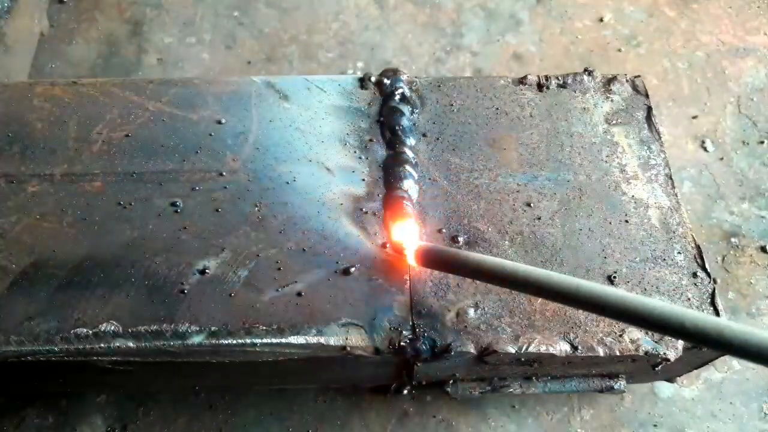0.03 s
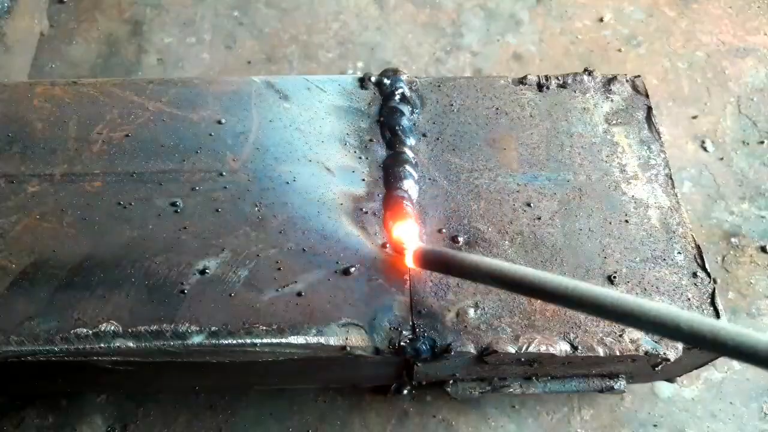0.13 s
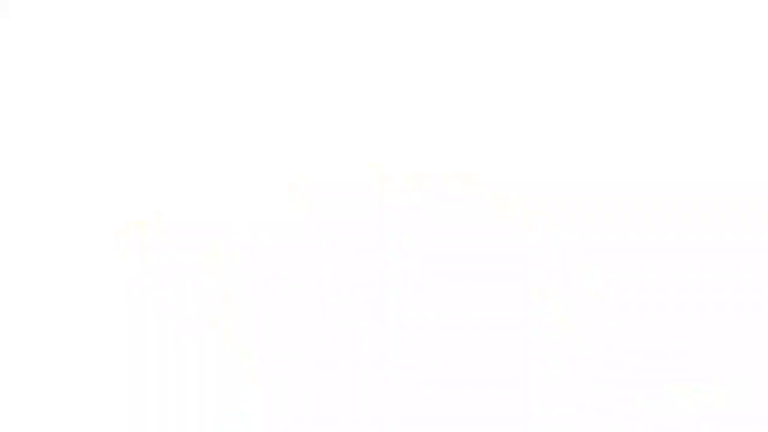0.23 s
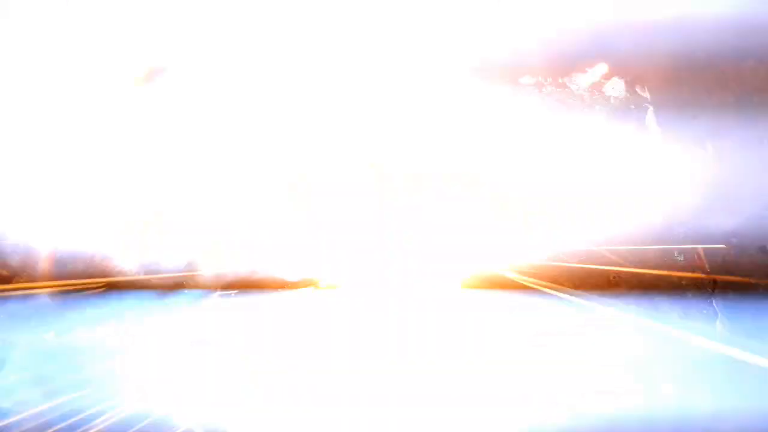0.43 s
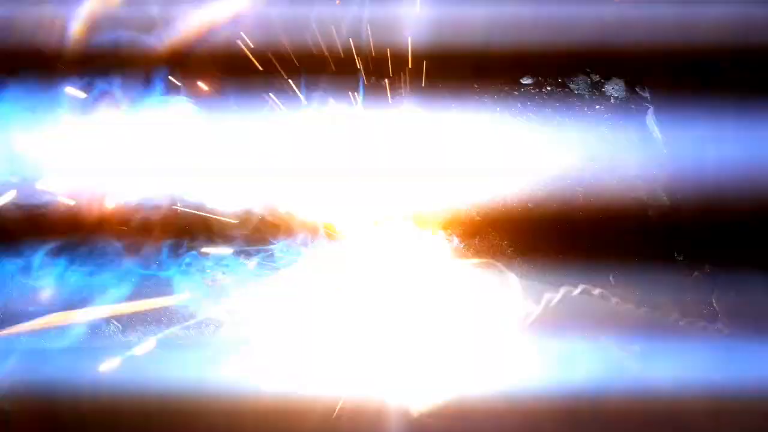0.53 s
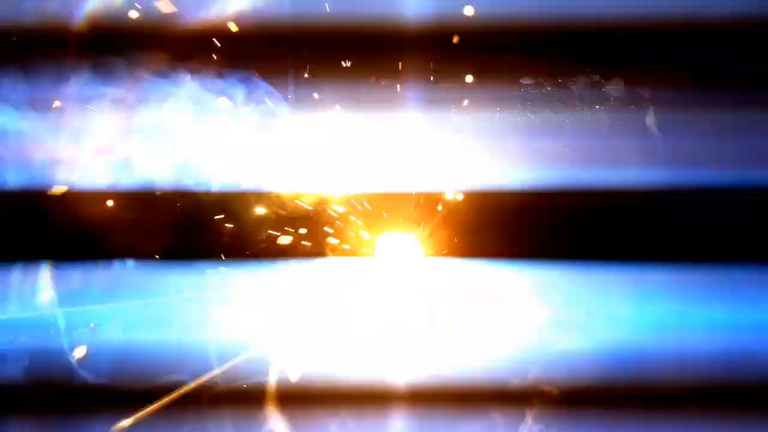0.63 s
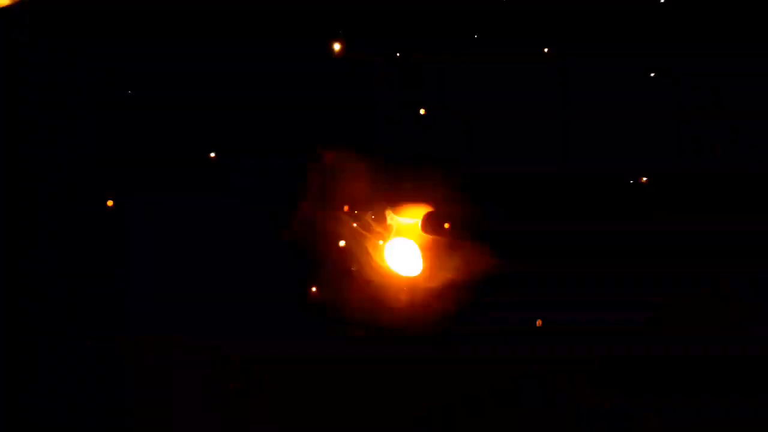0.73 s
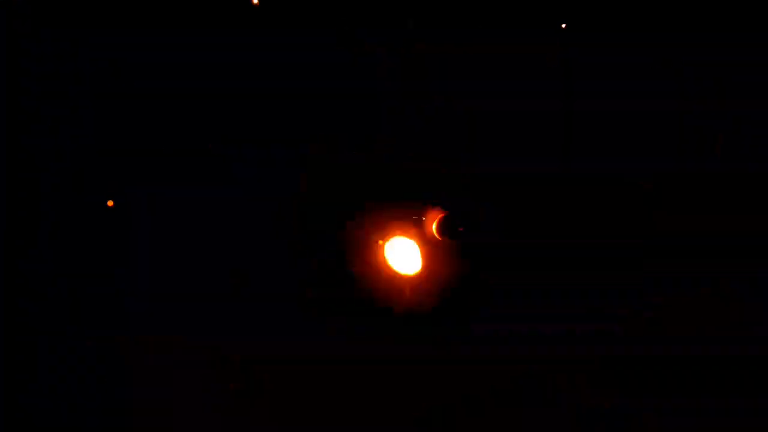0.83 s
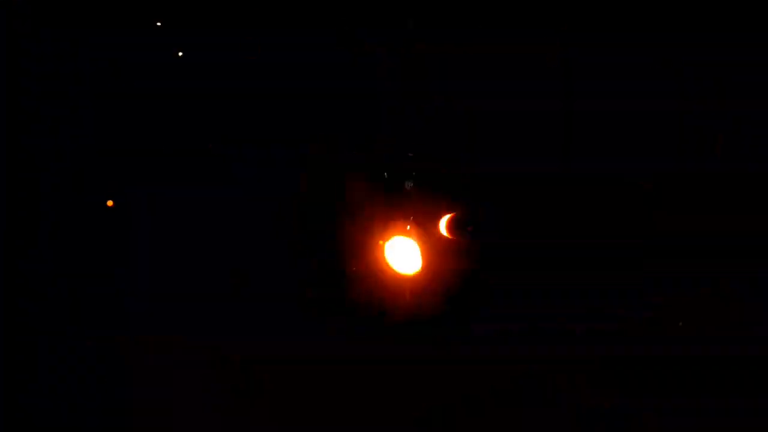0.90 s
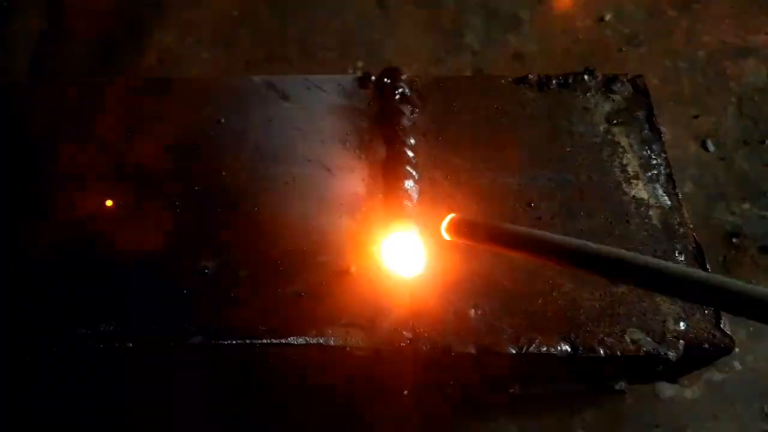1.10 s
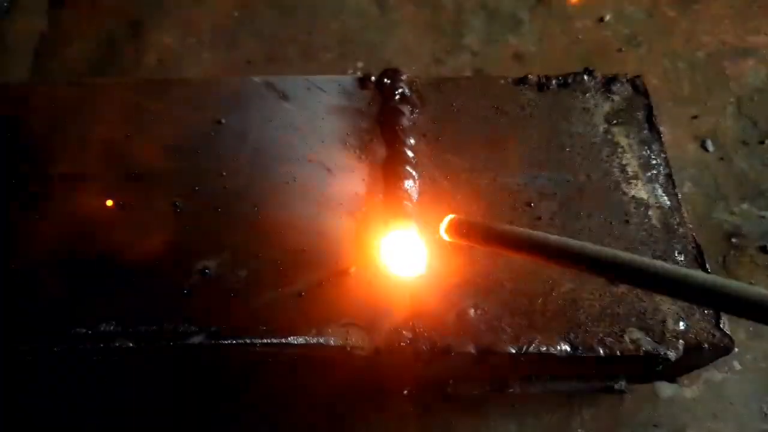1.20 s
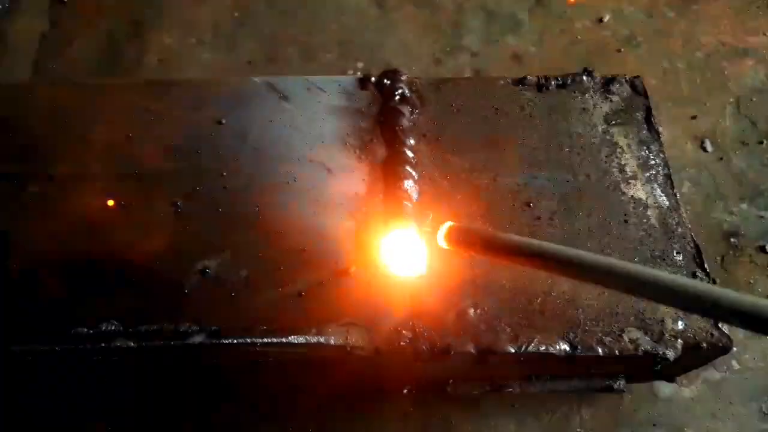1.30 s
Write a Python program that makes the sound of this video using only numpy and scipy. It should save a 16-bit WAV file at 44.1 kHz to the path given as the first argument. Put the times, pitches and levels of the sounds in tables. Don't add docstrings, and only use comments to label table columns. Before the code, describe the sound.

Short harsh electric welding arc on steel, buzzing and snapping, between quiet stretches of workshop hum

```python
import sys
import numpy as np
from scipy import signal
from scipy.fft import rfft, irfft
from scipy.io import wavfile
from scipy.ndimage import uniform_filter1d

SR = 44100
rng = np.random.default_rng(int(sys.argv[2]) if len(sys.argv) > 2 else 0)


def store_wav(level_fs):
    pcm = np.round(np.clip(np.atleast_2d(level_fs), -1, 1) * 32767)
    wavfile.write(sys.argv[1], SR, pcm.T.astype(np.int16))


def field_ratio(decibels):
    return 10 ** (np.asarray(decibels, dtype=float) / 20)


N = 59535
T = np.arange(N) / SR

# time_s, hiss_db, gas_roar_db
ARC = [(0.225, -97, -69), (0.228, -38.5, -48), (.28, -32.5, -41.5), (0.333, -36, -37.5),
       (0.343, -46.5, -60), (0.364, -31.5, -53), (0.429, -31.5, -34.5), (.53, -30, -48),
       (0.599, -34, -44.5), (.65, -37, -44.5), (.7, -36, -41), (0.746, -42.5, -43), (0.763, -46, -32),
       (0.778, -53, -40.5), (0.78, -64, -60)]
# time_s, pressure_jump [of full scale], spatter_db, short_circuit_before_ms
RESTRIKES = [(0.2783, -0.022, -30, 1.1), (0.342, -1.34, -27, 12), (0.3621, -0.26, -18, 5.4),
             (0.4118, -0.93, -15.5, 17), (0.4506, 0.6, -19.5, 4.6), (0.4798, -0.7, -17.5, 8.2),
             (.5104, -0.33, -17.5, 5.6), (0.5337, -0.2, -14.5, 8.1), (0.5629, 0.025, -33, 5.6),
             (0.5922, -0.087, -17, 1.3), (.655, -0.22, -36, 8.8), (.7085, -0.97, -27.5, 0.75)]


def rms_one(x):
    return x / np.sqrt(np.mean(x ** 2) + 1e-20)


def evened(x):
    return x / np.sqrt(uniform_filter1d(x * x, int(0.004 * SR)) + 1e-12)


def level(points):
    return field_ratio(np.interp(T, *np.transpose(points)))


def shape(x, spectrum):
    hz, db = np.transpose(spectrum)
    log_hz = np.log(np.arange(len(x) // 2 + 1) * SR / len(x) + 1)
    gain = field_ratio(np.interp(log_hz, np.log(hz), db))
    return rms_one(irfft(rfft(x) * gain, len(x)))


def peaks(x, rows):
    for hz, width_hz, db in rows:
        a, w = field_ratio(db / 2), np.pi * width_hz / SR
        c = -2 * np.cos(2 * np.pi * hz / SR)
        x = signal.lfilter([1 + w * a, c, 1 - w * a], [1 + w / a, c, 1 - w / a], x)
    return x


def drift(rate_hz):
    r = np.exp(-2 * np.pi * rate_hz / SR)
    wander = signal.lfilter([1], [1, -2 * r, r * r], rng.standard_normal(N + SR))
    return rms_one(wander[SR:])


def clicks(time_s, size):
    out = np.full(N, 1e-18)
    np.add.at(out, np.round(np.asarray(time_s) * SR).astype(int), size)
    return out


def decay(hits, fall_s, gain=1):
    return signal.lfilter([gain], [1, -np.exp(-1 / (fall_s * SR))], hits)


def ring(hits, hz, t60_s):
    r, w = field_ratio(-60 / (t60_s * SR)), 2 * np.pi * hz / SR
    return signal.lfilter([0, np.sin(w)], [1, -2 * r * np.cos(w), r * r], hits)


def snaps(time_s, peak_db):
    push_s, fizz_s, fizz_gain = 0.000017, 0.0003, 0.55
    hits = clicks(time_s, field_ratio(peak_db))
    k = np.arange(-12, 13) / (push_s * SR)
    push_pull = -k * np.exp(0.5 - k * k / 2)
    fizz = decay(hits, fizz_s, fizz_gain) * rng.standard_normal(N)
    return np.convolve(hits, push_pull, "same") + fizz


def crackle():
    sparks_per_s, spread_db, spark_share = 4000, 3, 0.4
    # freq_hz, density_db [dB per Hz]
    hiss_spectrum = [(180, -41), (300, -9), (978, -7), (1480, -10.5), (1810, -6), (7690, -8.5),
                     (13500, -8.5), (16000, -7.5)]
    sizes = field_ratio(spread_db * np.minimum(rng.exponential(1, N), 3.5)) * rng.choice([-1, 1], N)
    sparks = rms_one(sizes * (rng.random(N) < sparks_per_s / SR))
    mix = spark_share * sparks + (1 - spark_share) * rng.standard_normal(N)
    return shape(mix, hiss_spectrum)


def grinder():
    hum_hz, waver_hz, hum_db = 393, 8, 3
    # freq_hz, density_db [dB per Hz]
    machine_spectrum = [(21, -31), (35, 16), (108, 1), (279, -10.5), (399, -3.5), (758, -23), (930, -17.5),
                        (9830, -43.5), (16000, -56)]
    # freq_hz, width_hz, gain_db
    machine_bands = [(690, 59, 10), (850, 99, 4.5), (5650, 1200, -4.5), (9700, 900, 11), (10400, 1000, 6.5)]
    # time_s, level_db
    machine_level = [
        (0, -41),
        (.22, -39),
        (.45, -53),
        (.75, -64),
    ]
    # time_s, level_db
    hum_level = [
        (0.0, -49),
        (0.044, -60),
        (0.064, -59),
        (0.088, -72),
        (0.118, -48),
        (0.154, -54),
        (0.192, -43),
        (0.22, -55),
    ]
    machine = rms_one(peaks(shape(rng.standard_normal(N), machine_spectrum), machine_bands))
    phase = 2 * np.pi * np.cumsum(hum_hz + waver_hz * drift(10)) / SR
    hum = field_ratio(hum_db) * level(hum_level + [(0.3, -90)]) * np.sin(phase)
    return level(machine_level) * machine + hum


def room_tone():
    rest_db, fade_db_per_s, fade_from_s = -53, 8.5, 0.8
    # freq_hz, density_db [dB per Hz]
    rest_spectrum = [(21, -31), (35, 5.5), (151, -7.5), (739, -16), (907, -19), (1480, -19.5),
                     (3440, -28.5), (16000, -70)]
    gain = field_ratio(rest_db - fade_db_per_s * np.maximum(T - fade_from_s, 0))
    return gain * shape(rng.standard_normal(N), rest_spectrum)


def fan():
    # freq_hz, level_db [rms]
    fan_tones = [(53.8, -52.5), (102.3, -69.5), (317.6, -67), (414.5, -69.5), (958.2, -82.5)]
    out = np.zeros(N)
    for hz, db in fan_tones:
        out += field_ratio(db + 2 + 3 * drift(7)) * np.sin(2 * np.pi * (hz * T + rng.random()))
    return out


def bird():
    # start_s, length_s, from_hz, to_hz, level_db
    chirps = [
        (0, .06, 3950, 3880, -70),
        (.095, .05, 3950, 2950, -65.5),
        (1.175, .03, 3700, 2950, -70),
    ]
    out = np.zeros(N)
    for start_s, length_s, from_hz, to_hz, db in chirps:
        u = np.clip((T - start_s) / length_s, 0, 1)
        hz = from_hz + (to_hz - from_hz) * u
        out += field_ratio(db) * np.sin(np.pi * u) * np.sin(2 * np.pi * np.cumsum(hz) / SR)
    return out


def arc():
    ripple_hz, ripple_peak_s, ripple_db = 100, 0.2385, 2.6
    short_db, short_onset_s = -14, 0.00067
    # freq_hz, density_db [dB per Hz]
    roar_spectrum = [(50, -23), (100, -0.5), (300, -2.5), (900, -13.5), (1500, -18.5), (2500, -33.5),
                     (3500, -40), (6000, -94)]
    # time_s, peak_db
    arc_snaps = [(0.2271, -20), (0.2394, -9), (0.2475, -8), (0.2694, -13), (0.2763, -14), (0.2866, -19),
                 (0.2968, -19), (0.2998, -14), (0.3073, -10), (0.3106, -9), (0.3193, -15), (0.3262, -18),
                 (0.3293, -18), (0.3326, -15), (0.3419, -9), (0.3622, -4), (0.3878, -18), (0.398, -14),
                 (0.4031, -14), (0.4114, -5), (0.4297, -10), (0.4322, -12), (0.4508, -4), (0.4801, -5),
                 (0.4907, -14), (0.4993, -10), (0.5104, -4), (0.5339, -4), (0.5542, -12), (0.5637, -5),
                 (0.5828, -8), (0.5894, -18), (0.5923, -4), (0.6168, -13), (0.6187, -15), (0.6376, -25),
                 (0.6391, -23), (0.6478, -17), (0.655, -5), (0.6604, -20), (0.6787, -23), (0.6895, -21),
                 (0.704, -14), (0.7085, -7), (0.7323, -8), (0.7513, -26)]

    time_s, hiss_db, roar_db = np.transpose(ARC)
    gate = ((T > time_s[0]) & (T < time_s[-1])).astype(float)
    for at, _, _, short_ms in RESTRIKES:
        shorted = np.clip((T - at + short_ms / 1000) / short_onset_s, 0, 1) * (T < at)
        gate *= field_ratio(short_db * shorted)
    ripple = ripple_db * np.cos(2 * np.pi * ripple_hz * (T - ripple_peak_s))
    flicker_db = 1.5 * drift(100) + 2 * drift(540)
    burn = gate * field_ratio(np.interp(T, time_s, hiss_db) + ripple + flicker_db) * evened(crackle())
    roar_gain = gate * field_ratio(np.interp(T, time_s, roar_db) + ripple + 4 * drift(75))
    roar = roar_gain * shape(rng.standard_normal(N), roar_spectrum)
    snap_s, snap_db = np.transpose(arc_snaps)
    return burn + flares() + roar + snaps(snap_s, snap_db - 0.5)


def flares():
    rise_s, fall_s, split_hz = 0.0015, 0.0018, 5000
    # time_s, hiss_db, brightness_db
    arc_flares = [(0.2269, -29.5, 0), (0.2392, -17, 5.5), (0.249, -23, 3), (0.2589, -21.5, 2.5),
                  (0.27, -25.5, -1.5), (0.2777, -23.5, -2.5), (0.2905, -29.5, 9), (0.2997, -25, 3),
                  (0.311, -25, 6.5), (0.32, -26, -8.5), (0.331, -32.5, 1), (0.3756, -27.5, -10.5),
                  (0.3811, -27.5, 1), (0.3915, -24, 0), (0.399, -27, -4), (0.401, -36.5, 3),
                  (0.4209, -27.5, -8), (0.429, -16.5, -6), (0.4388, -25.5, -6.5), (0.4609, -28.5, -9.5),
                  (0.469, -22.5, -12.5), (0.4995, -22.5, -8.5), (0.525, -28.5, -5), (0.5515, -24.5, -2.5),
                  (0.5838, -23.5, -6), (0.618, -26, -1.5), (0.6313, -32, 1), (0.6412, -28.5, 0.5),
                  (0.6729, -32.5, -5), (0.6813, -33, 2), (0.691, -29.5, -1.5), (0.7212, -31, -2.5),
                  (0.7323, -21.5, 8.5), (0.7413, -22.5, -5), (0.7526, -41, -1), (0.7605, -36, -12),
                  (0.7711, -39.5, -10),
                  (0.2352, -32, 4),
        (0.308, -28.5, 6),
        (0.371, -26, -5),
        (.4905, -26.5, -2),
        (.544, -30.5, -0.5),
        (0.608, -31, 5.5),
        (0.612, -26.5, 5),
        (0.621, -27.5, -3),
        (0.7453, -34, -7),
    ]
    noise, dull, bright = crackle(), np.zeros(N), np.zeros(N)
    low = signal.sosfiltfilt(signal.butter(2, split_hz, fs=SR, output="sos"), noise)
    for at, db, bright_db in arc_flares:
        age = np.where(T < at, (at - T) / rise_s, (T - at) / fall_s)
        power = (field_ratio(db) * np.exp(-age)) ** 2
        dull += power * field_ratio(-bright_db)
        bright += power * field_ratio(bright_db)
    return 0.55 * np.sqrt(dull) * evened(low) + 0.84 * np.sqrt(bright) * evened(noise - low)


def puffs():
    # time_s, size [of full scale]
    pockets = [(.228, 0.029), (.2395, -0.087), (.248, .08), (0.259, -0.17), (0.2766, -0.38), (0.2965, 0.18),
               (.318, 0.061), (0.3305, 0.036), (0.371, -0.1), (0.3759, -0.21), (0.398, -0.089),
               (.428, -0.1), (0.4376, -0.12), (0.4682, 0.029), (.55, 0.091), (0.593, -0.069), (.7, -0.038),
               (0.7636, 0.016), (0.7746, 0.068)]
    return ring(clicks(*np.transpose(pockets)), hz=750, t60_s=0.005)


def restrikes():
    jump_rise_s, jump_fall_s, spatter_fall_s = 0.00005, 0.004, 0.0027
    # freq_hz, width_hz, gain_db
    spatter_body = [(2000, 2300, 8.5)]
    at, jump, spatter_db, _ = np.transpose(RESTRIKES)
    envelope = decay(clicks(at, field_ratio(spatter_db)), spatter_fall_s)
    spatter = 1.5 * envelope * evened(peaks(crackle(), spatter_body))
    rise_gain = 1 - np.exp(-1 / (jump_rise_s * SR))
    pressure = decay(decay(clicks(at, jump), jump_rise_s, rise_gain), jump_fall_s)
    return spatter + pressure


def core_knock():
    # time_s, size [of full scale], freq_hz, t60_s
    knock = (.76, -0.03, 105, 0.2)
    at, size, hz, t60_s = knock
    return ring(clicks([at], [size]), hz, t60_s)


def transformer():
    from_s, to_s, fade_s = 0.84, 1.1, 0.02
    # freq_hz, width_hz, level_db [rms]
    whine = [(1262, 30, -66), (1640, 30, -68)]
    out = np.zeros(N)
    for hz, width_hz, db in whine:
        out += field_ratio(db) * rms_one(ring(rng.standard_normal(N), hz, 2.2 / width_hz))
    return out * np.clip(np.minimum(T - from_s, to_s - T) / fade_s, 0, 1)


def steel():
    bead_db, bead_t60_s, tick_gain_db, ping_gain_db = -58, 2.2, -4, 1
    # time_s, peak_db
    ticks = [(.9005, -52), (.9355, -47), (.9385, -50), (1.0725, -49), (1.076, -51), (.9737, -47),
             (.993, -50), (1.004, -52), (1.011, -50), (1.0179, -51), (1.0278, -52), (1.035, -52),
             (1.047, -54), (1.0884, -52), (1.1239, -49), (1.158, -57), (1.1785, -58), (1.2509, -55),
             (1.259, -59)]
    # time_s, level_db
    pings = [
        (.9355, -61),
        (.973, -71),
        (1.0725, -67),
        (1.1235, -73),
    ]
    # freq_hz, level_db, t60_s
    modes = [(3820, -4, .04), (4220, -2, .025), (7850, -5, .05), (8716, -2, .08), (8942, -3, .05),
             (10150, -3, .06), (11200, -5, .03), (12300, -2, .05), (12750, -3, .07), (13650, -5, .07),
             (14740, -7, .04), (15430, -6, .05)]
    after_s = T - ARC[-1][0]
    bead_gain = (after_s > 0) * field_ratio(bead_db - 60 * after_s / bead_t60_s)
    out = bead_gain * peaks(crackle(), [(13560, 4200, -7)])
    tick_s, tick_db = np.transpose(ticks)
    out += snaps(tick_s, tick_db + tick_gain_db)
    ping_s, ping_db = np.transpose(pings)
    for hz, mode_db, t60_s in modes:
        uneven_db = rng.normal(0, 2.5, len(ping_s))
        hits = clicks(ping_s, field_ratio(ping_db + ping_gain_db + mode_db + uneven_db))
        out += ring(hits, hz, t60_s)
    return out


def room(x):
    t60_s, first_wall_s, band_hz = 0.47, 0.006, [300, 14000]
    tail = rng.standard_normal(N) * field_ratio(-60 * T / t60_s) * (T > first_wall_s)
    tail = signal.sosfilt(signal.butter(1, band_hz, "band", fs=SR, output="sos"), tail)
    return signal.fftconvolve(x, tail / np.sqrt(np.sum(tail ** 2)))[:N]


def scene():
    shop = grinder() + room_tone() + fan() + transformer()
    near = arc() + puffs() + restrikes() + core_knock() + steel()
    fade_in = np.minimum(T / 0.002, 1)
    mix = near + field_ratio(-24.5) * room(near) + fade_in * shop + bird()
    return mix[None]


def band_limit(x):
    return signal.sosfilt(signal.butter(12, 16810, fs=SR, output="sos"), x)


def record(dry):
    low_hz, low_q, top_hz, ceiling = 80, 0.75, 15500, 1.2
    # freq_hz, width_hz, gain_db
    housing = [(930, 130, 4), (1490, 160, -3), (1774, 150, 5), (3080, 72, 4), (3920, 480, 5.5),
               (7540, 790, 6.5), (9000, 220, -9.5), (10730, 380, 3)]
    w = 2 * np.pi * low_hz / SR
    a, c = np.sin(w) / 2 / low_q, np.cos(w)
    cut = [(1 + c) / 2, -1 - c, (1 + c) / 2, 1 + a, -2 * c, 1 - a]
    x = peaks(signal.sosfilt(np.array([cut, cut]) / (1 + a), dry), housing)
    treble_cut = signal.cheby2(8, 22, top_hz + 300, fs=SR, output="sos")
    x = 0.985 * signal.sosfiltfilt(treble_cut, x) + 0.015 * x
    return band_limit(ceiling * np.tanh(x / ceiling))


dry = scene()
out = record(dry)
store_wav(out)
```